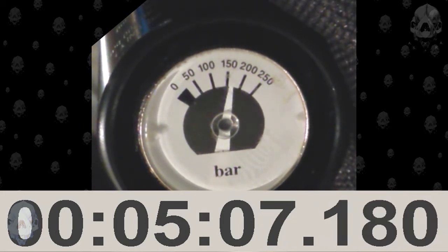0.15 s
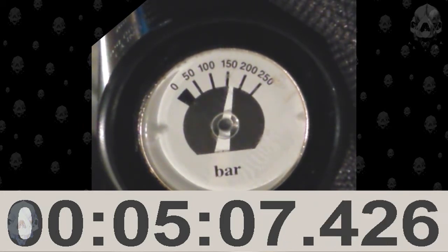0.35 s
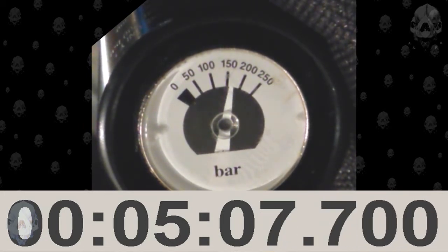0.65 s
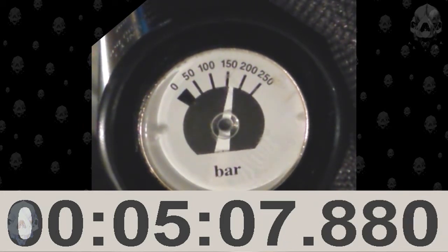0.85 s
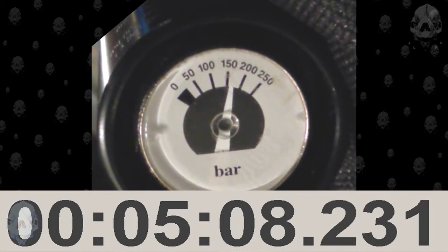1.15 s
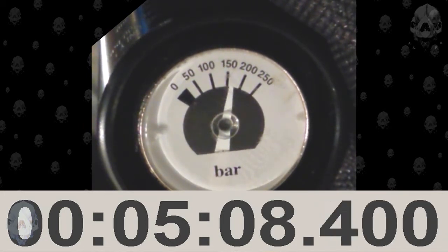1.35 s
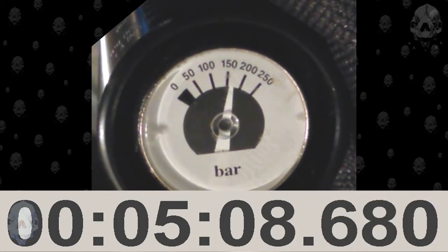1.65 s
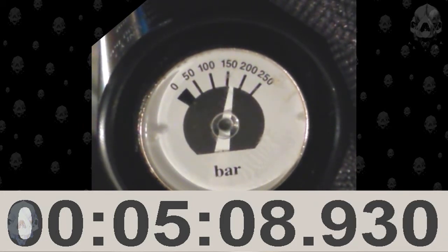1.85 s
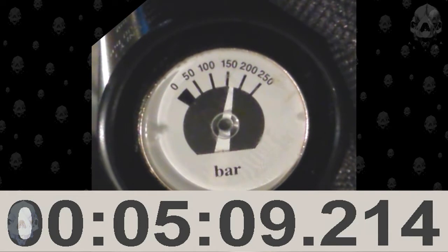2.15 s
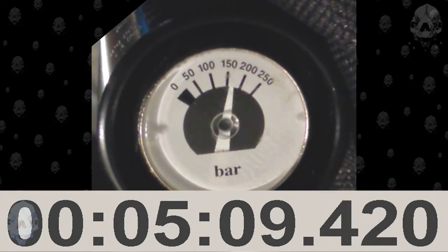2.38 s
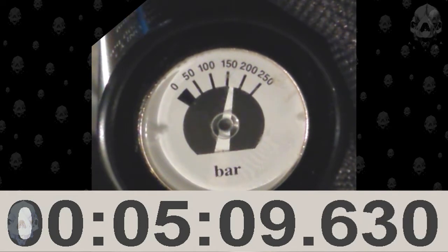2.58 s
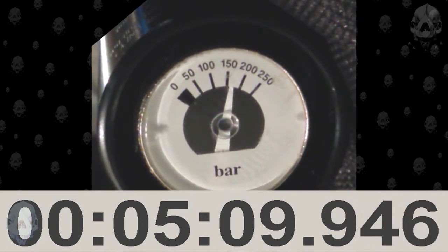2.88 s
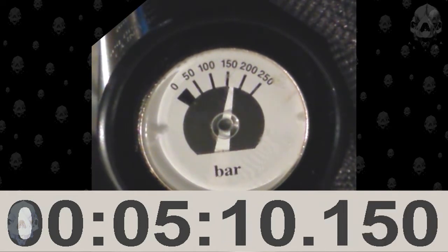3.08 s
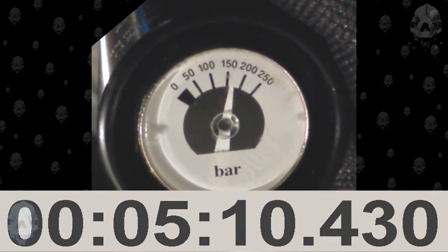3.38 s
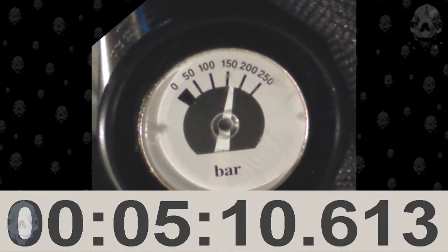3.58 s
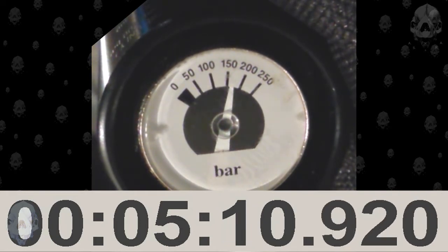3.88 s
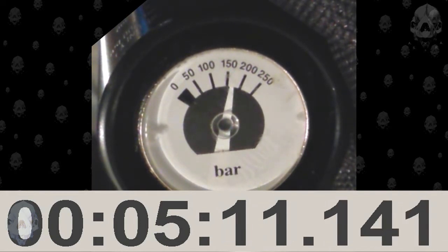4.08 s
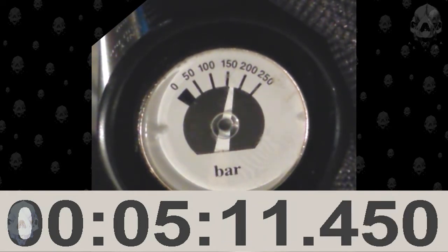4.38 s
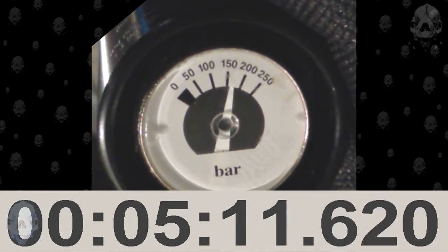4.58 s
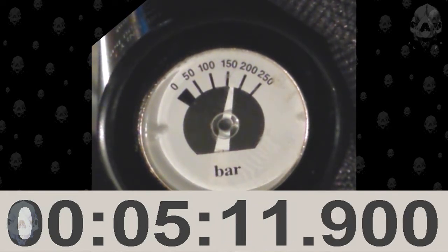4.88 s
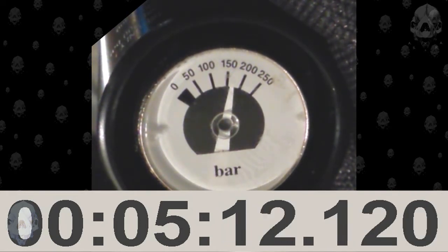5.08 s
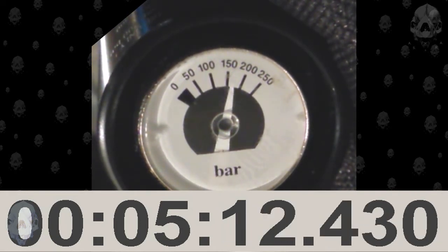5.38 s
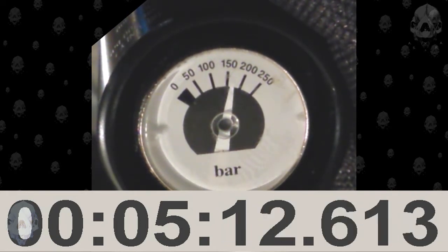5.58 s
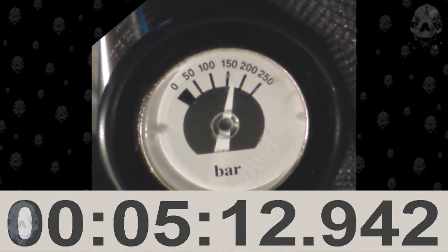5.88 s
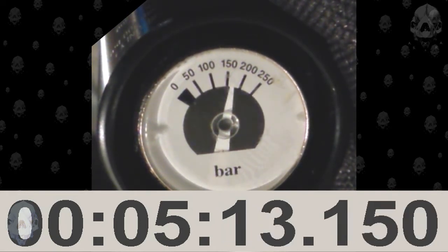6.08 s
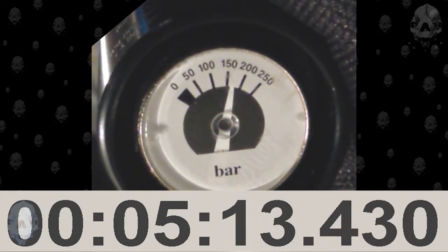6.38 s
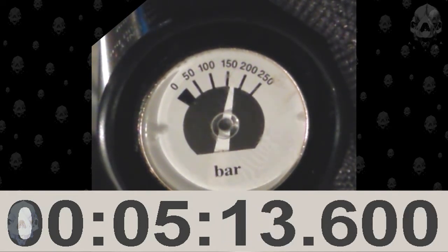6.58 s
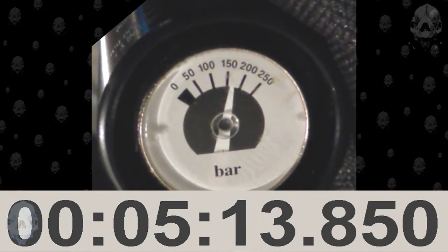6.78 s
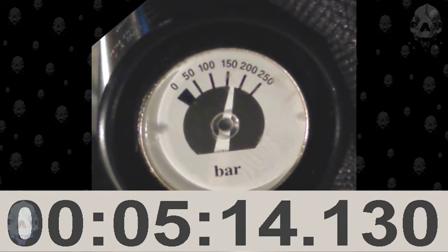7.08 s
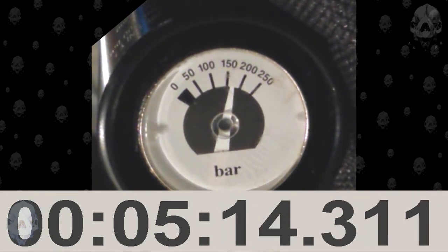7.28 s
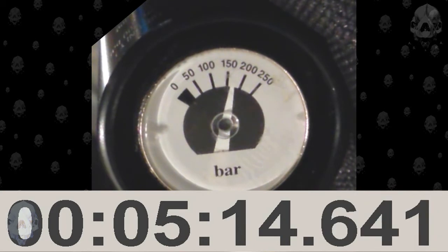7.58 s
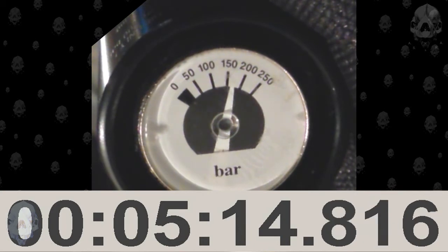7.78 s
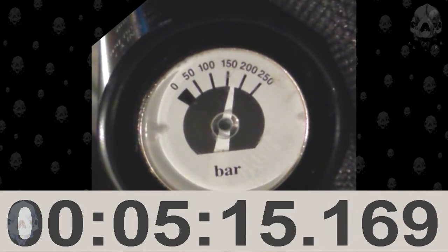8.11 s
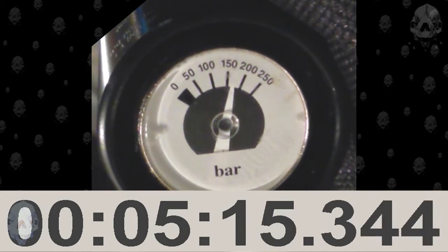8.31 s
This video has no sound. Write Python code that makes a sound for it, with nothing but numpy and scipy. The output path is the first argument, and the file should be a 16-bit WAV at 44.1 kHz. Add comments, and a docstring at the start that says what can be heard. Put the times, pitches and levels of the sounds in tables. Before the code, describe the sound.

In a small room, an air compressor works without pause, heard from nearby in stereo. Piston chugs, knocking and grinding gears and a pulsing low hum form an even pattern that comes round almost twice a second. Above it are a motor whirr, a thin air hiss and a rasping, ticking valve that gives a few light snaps in the first half. Late on, one rough stroke briefly shakes the housing.

```python
"""A small geared piston compressor fills an air cylinder indoors, its crank turning just under twice a second.
Three compressions a turn load the machine: the piston chugs, the housing drones in surges and the gears
grind under their whine. A valve rasps and ticks each turn, at times snapping, over a thin hiss of air.
Impacts excite the resonances of housing, motor case and air line; motor and frame hum at harmonics
of the crank. Near walls reflect the clatter over a faint rumble, and one late stroke judders."""
import sys
import numpy as np
from scipy import signal
from scipy.fft import rfft, irfft, next_fast_len
from scipy.io import wavfile
from scipy.ndimage import map_coordinates

SR = 44100
rng = np.random.default_rng(int(sys.argv[2]) if len(sys.argv) > 2 else 0)


def transcribe(signal):
    """Save signal, clipped to [-1, 1], as a 16-bit WAV file at the path in sys.argv[1]."""
    frames = np.atleast_2d(signal).T
    limited = np.clip(frames, -1, 1)
    pcm = np.round(limited * 32767).astype(np.int16)
    wavfile.write(sys.argv[1], SR, pcm)


N = 372644
TURN_S = 0.57352  # period of the crank
TIME = np.arange(N) / SR
ONE_TURN = np.arange(round(TURN_S * SR)) / SR

# spectrum of the air's hiss: frequency_hz, level_db
AIR_SPECTRUM = [(2000, -21.5), (3800, 3), (4600, 7), (5500, 4), (7000, -2), (8000, 0.5), (9400, 4.5),
                (11000, 1), (13500, -10), (15800, -13)]
# resonances of the steel air line: centre_hz, width_hz, lift_db, left_over_right_db
PIPE_MODES = [(4570, 210, -3.5, -18), (6100, 390, 4.5, -4.5), (8500, 280, 7.5, 9), (9050, 130, 11, 8.5),
              (9380, 170, 1, -15)]


def amp(db):
    """Decibels to amplitude ratio."""
    return 10 ** (np.asarray(db) / 20)


def unit(x):
    """Scale to rms 1."""
    return x / np.sqrt(np.mean(x ** 2) + 1e-20)


def along(points, hz):
    """Interpolate (frequency_hz, value) points on a logarithmic frequency axis."""
    frequencies, values = np.transpose(points)
    return np.interp(np.log(hz + 1), np.log(frequencies + 1), values)


def wobble(rate):
    """Smooth random modulation, rate knots a second."""
    return map_coordinates(rng.standard_normal(int(N * rate / SR) + 4), [TIME * rate])


def every_turn(pattern, clock):
    """Periodic extension of a waveform one turn long."""
    return map_coordinates(pattern, [clock / TURN_S % 1 * len(pattern)], mode="grid-wrap")


def shaft(clock, order):
    """A rotational harmonic: order cycles to each turn of the crank."""
    return np.cos(2 * np.pi * order * clock / TURN_S)


def swells(rows, clock, rise_s, fall_s, period_s=TURN_S):
    """Periodic envelope: linear rise, hold and exponential fall for each (start_s, length_s, height)."""
    out = 0
    for start, length, height in rows:
        age = (clock - start) % period_s
        out = out + height * np.minimum(age / rise_s, 1) * np.exp(-np.maximum(age - length, 0) / fall_s)
    return out


def bursts(rows, decay_s, period_s, scatter_db):
    """Damped impacts: exponentially decaying noise at each (start_s, level_db), in every period."""
    envelope = np.zeros(N)
    for start, db in rows:
        index, age = np.divmod(TIME - start, period_s)
        sizes = amp(db + scatter_db * rng.standard_normal(size=32))
        envelope += sizes[index.astype(int) + 1] * np.exp(-age / decay_s)
    return envelope * rng.standard_normal((2, N))


def grit(shape, per_s):
    """Shot noise: tiny impacts, random in time and size."""
    return unit(rng.standard_normal(shape) * (rng.random(shape) < per_s / SR))


def teeth(clock, per_s, repeat):
    """Tooth impacts: the share repeat of their power is periodic with the crank, the rest random."""
    worn = np.array([every_turn(pattern, clock) for pattern in grit((2, len(ONE_TURN)), per_s)])
    return np.sqrt(repeat) * unit(worn) + np.sqrt(1 - repeat) * grit((2, N), per_s)


def load(clock):
    """Cyclic loading: the piston's effort in dB over idling."""
    # three compressions a turn: start_s, length_s, load_db
    strokes = [(.062, 0.098, 11), (.279, 0.18, 11), (.491, 0.082, 9.5)]
    return swells(strokes, clock, rise_s=.035, fall_s=.028)


def radiate(drives, spectrum, modes=()):
    """Source and filter: two independent drives pass through a resonant body into stereo, at rms 1."""
    # likeness of the two channels: frequency_hz, correlation
    coherence = [(250, 0.93), (400, 0.96), (640, 0.5), (1400, 0.45), (3100, 0.023), (6000, 0)]
    # stereo balance of the machine: frequency_hz, left_over_right_db
    balance = [(200, -9.5), (380, -3), (700, 0.5), (1300, 0), (2300, 3), (4400, 0.5), (15000, 0.5)]
    size = next_fast_len(N + SR // 2, True) // 2 * 2
    hz = np.fft.rfftfreq(size, 1 / SR)
    gain_db, pan_db = along(spectrum, hz), along(balance, hz)
    for centre_hz, width_hz, lift_db, side_db in modes:
        bell = 1 / (1 + (2 * (hz - centre_hz) / width_hz) ** 2)
        gain_db += lift_db * bell
        pan_db += (side_db - along(balance, centre_hz)) * bell
    cepstrum = irfft(np.log(amp(gain_db)))
    cepstrum[1:size // 2] *= 2  # folding gives a causal, minimum-phase response
    cepstrum[size // 2 + 1:] = 0
    angle = np.arccos(np.clip(along(coherence, hz), -1, 1)) / 2
    mid, side = rfft(drives, size) * np.exp(rfft(cepstrum)) * [np.cos(angle), np.sin(angle)]
    stereo = np.array([mid + side, mid - side]) * amp([pan_db / 2, -pan_db / 2])
    return unit(irfft(stereo)[:, :N])


def hum(clock):
    """Harmonics of the crank: frame and motor hums swell once a turn, gear tones with the load."""
    # tones of the gear train: cycles_per_turn, level_db
    mesh_tones = [(51, -52), (94, -44.5), (109, -35), (163, -38), (197, -40), (267, -42), (357, -42.5)]

    def tone(order):
        return np.sqrt(2) * np.sin(2 * np.pi * (order * clock / TURN_S + rng.random()))

    frame_db = -51 + swells([(.255, .42, 11.8)], clock, rise_s=0.037, fall_s=0.08)
    motor_db = -46 + swells([(.535, .25, 10.5)], clock, rise_s=0.077, fall_s=0.01)
    low = amp(frame_db) * tone(order=37) * amp([[-.5], [.5]]) + amp(motor_db) * tone(order=68)
    mesh = sum(amp(db + 1.5 * wobble(5)) * tone(order) for order, db in mesh_tones)
    return low + mesh * unit(amp(load(clock))) * amp([[-1], [1]])


def motor(clock):
    """Amplitude modulation: the motor's whirr buzzes with its hum and throbs with its shaft."""
    # spectrum of the whirr: frequency_hz, level_db
    spectrum = [(1200, -29.5), (2200, -12.5), (2600, -0.5), (3300, -0.5), (3900, -11.5), (6000, -41)]
    # resonances of the steel case: centre_hz, width_hz, lift_db, left_over_right_db
    case_modes = [(2430, 98, 7.5, 2), (2897, 58, 9, -1), (3200, 64, 2, 5.5), (3410, 18, -1, 0)]
    buzz_db = 1.5 * shaft(clock, order=68) + 1.8 * shaft(clock, order=18) + 1.6 * wobble(50)
    return amp(-31) * radiate(amp(buzz_db) * grit((2, N), per_s=14000), spectrum, case_modes)


def air(clock):
    """Flow noise excites the steel line's modes and flutters with the motor, over a steady hiss."""
    flutter_db = 0.12 * load(clock) + .7 * shaft(clock, order=34) + 0.96 * wobble(90)
    flow = amp(flutter_db) * grit((2, N), per_s=12000)
    sizzle = amp(-39.5) * radiate(flow, AIR_SPECTRUM, PIPE_MODES)
    hiss = amp(-56) * radiate(rng.standard_normal((2, N)), [(5000, -20), (11000, 0), (15800, -3)])
    return sizzle + hiss


def rumble():
    """Stationary low-frequency noise: the room's faint rumble."""
    spectrum = [(15, -9), (35, -28), (58, 5.5), (85, -2.5), (110, 6.5), (200, -22), (1000, -80)]
    return amp(-42) * radiate(rng.standard_normal((2, N)), spectrum)


def gears(clock):
    """Impact excitation: teeth grind with the load and knock in the housing; a whine throbs above."""
    # knocks as the backlash is taken up in each turn: start_s, level_db
    knocks = [(.009, -8.5), (.120, -3), (.150, -2.5), (.277, -3), (.310, 3), (.377, 1), (.422, -24),
              (.452, 5.5), (.535, 3.5)]
    # spectrum of the grinding: frequency_hz, level_db
    spectrum = [(100, -51), (250, -34), (400, -14), (540, -13), (700, -0.5), (870, -5), (950, -10),
                (1300, -3.5), (1550, -8.5), (1750, -18), (2200, -17), (3300, -12.5), (4000, -30),
                (7000, -55.5)]
    # resonances of the housing: centre_hz, width_hz, lift_db, left_over_right_db
    housing_modes = [(625, 75, 10.5, -4), (773, 24, 5.5, 9.5), (811, 34, 6.5, -2.5), (845.3, 14, 11.5, -6),
                     (874, 21, 9.5, -3), (1015, 21, 1, -10), (1169, 137, 9, -10.5), (1460, 58, 4.5, -1.5)]
    layshaft = shaft(clock - .008, order=17)
    throb_db = 0.6 * layshaft + 2 * shaft(clock, 36) + shaft(clock, 108) + shaft(clock, 133)
    grinding = unit(amp(0.41 * load(clock) + throb_db)) * teeth(clock, per_s=14000, repeat=0.067)
    knocking = amp(1.5) * bursts(knocks, decay_s=0.007, period_s=TURN_S, scatter_db=0.4)
    whine_hz = 809.7 + 5.99 * wobble(20)
    whine_db = -33 + 6 * layshaft + 2 * wobble(40)
    whine = amp(whine_db) * np.sin(2 * np.pi * np.cumsum(whine_hz) / SR)
    return amp(-23) * radiate(grinding + knocking, spectrum, housing_modes) + whine


def room(sound):
    """Reverberation: reflections from the walls decay exponentially, each frequency at its own rate."""
    # reverberation time: frequency_hz, t60_s
    decay_times = [(200, 0.19), (2000, 0.2), (10000, 0.23)]
    hz, age, noise = signal.stft(rng.standard_normal((2, SR // 2)), SR, nperseg=256)
    colour = amp(along([(300, -36), (700, 9)], hz))[:, None]
    decay = amp(-60 * age / along(decay_times, hz)[:, None])
    tail = signal.istft(noise * colour * decay, SR, nperseg=256)[1]
    return signal.fftconvolve(sound, tail / np.linalg.norm(tail[0]), axes=1)[:, :N]


def piston(clock):
    """Periodic forcing: the piston chugs at each compression and thumps in a falling chirp on reversal."""
    # spectrum of the chug: frequency_hz, level_db
    spectrum = [(120, -55), (190, -8.5), (260, 0.5), (300, -3.5), (380, -5), (450, 1.5), (540, -4),
                (640, 1), (730, -0.5), (950, -18.5), (2000, -33)]
    # thumps in each turn: centre_s, pitch_hz, fall_hz_per_s, half_length_s, level_db
    thumps = [(.055, 76, 150, .022, -30), (.536, 280, 1500, .013, -25.5)]
    force = amp(load(clock)) * teeth(clock, per_s=6000, repeat=0.54)
    out = amp(-29.5) * radiate(force, spectrum, [(480, 11, 4.1, -3.9)])
    for centre, hz, fall, half_length, db in thumps:
        age = (clock - centre + TURN_S / 2) % TURN_S - TURN_S / 2
        cycles = hz * age - fall * age ** 2 / 2 + 0.13 * wobble(1.675)
        envelope = amp(db + wobble(1.57)) * np.exp(-(age / half_length) ** 2)
        out += envelope * np.sqrt(2) * np.sin(2 * np.pi * cycles)
    return out


def drone(clock):
    """Stiffening resonance: the housing sings sharper when loud and swoops down as the valve lets go."""
    # surges in each turn: start_s, length_s, level_db
    surges = [(0.082, 0.03, -17), (0.177, .038, -30), (0.279, 0.0302, -20), (0.316, 0.053, -17.5),
              (0.416, 0.042, -31), (0.528, 0.062, -31)]
    rest_hz, stiffen_hz = 219.6, 3.5
    swoop_start_s, settle_s = .521, .024
    heights = [(start, length, amp(db)) for start, length, db in surges]
    level = amp(-28.5) + swells(heights, ONE_TURN, rise_s=0.0076, fall_s=0.0049)
    swoop_hz = 81.7 * np.exp(-((ONE_TURN - swoop_start_s) % TURN_S) / settle_s)
    cycles = np.cumsum(rest_hz + stiffen_hz * level / level.max() + swoop_hz) / SR
    cycles *= np.round(cycles[-1]) / cycles[-1]  # retune slightly to whole cycles per turn
    song = every_turn(np.sqrt(2) * level * np.sin(2 * np.pi * cycles), clock + 0.00027 * wobble(11))
    shudder_spectrum = [(150, -71), (185, -2), (235, -12), (275, -11), (360, -40.5)]
    shudder = radiate(teeth(clock, per_s=1700, repeat=0.3), shudder_spectrum)
    roughness = amp(-18) * shudder * every_turn(level, clock)
    return amp(.5 * wobble(7)) * (song * amp([[-.7], [.7]]) + roughness)


def after_ring(clock):
    """Beating: shaken by each compression, the housing rings on loosely, close to its drone's pitch."""
    # slow drift of the ringing: time_s, level_db
    drift = [(0, -24), (1.5, -29.5), (3.2, -28.5), (5.5, -26.5), (7.2, -26), (8.4, -26)]
    shaking = amp(load(clock - .025)) * teeth(clock, per_s=3000, repeat=.2)
    spectrum = [(130, -36.5), (180, -8), (250, -5), (310, -10), (420, -40)]
    ring = radiate(shaking, spectrum, [(222.7, 64, 25, 1.0)])
    return amp(np.interp(TIME, *np.transpose(drift))) * ring


def valve(clock):
    """Flow and impact excitation: the valve rasps, sets its steel ringing, ticks on its seat and snaps."""
    # blow-off in each turn: start_s, length_s, rasp_lift_db
    blow_off = [(.491, 0.084, 9)]
    # spectrum of the rasp: frequency_hz, level_db
    spectrum = [(150, -25), (280, 1.5), (420, -2.5), (900, -16.5), (1400, 4.5), (2000, 2.5), (2500, -9.5),
                (3000, 2), (4000, -11), (8000, -37)]
    # ticks in each turn: start_s, relative_level_db
    ticks = [(.206, -3), (.490, -8), (.509, -2), (.544, 0)]
    # single hard snaps: start_s, relative_level_db
    snaps = [(1.6914, -16), (2.787, -20), (2.8376, -16), (3.9526, -20), (4.558, -12.5)]
    rasp_db = 0.24 * load(clock) + swells(blow_off, clock, rise_s=.008, fall_s=.008)
    rasp = amp(-33) * radiate(amp(rasp_db) * teeth(clock, per_s=9000, repeat=0.17), spectrum)
    build_up = amp(1.36 * swells(blow_off, clock, rise_s=0.069, fall_s=0.015))  # lags the rasp
    ring = amp(-36.8) * unit(build_up * np.sin(2 * np.pi * (2936 * TIME + .18 * wobble(70))))
    tick_drive = bursts(ticks, decay_s=.006, period_s=TURN_S, scatter_db=1.8)
    snap_drive = bursts(snaps, decay_s=.0055, period_s=N / SR, scatter_db=0)
    ticking = amp(-49) * radiate(tick_drive, AIR_SPECTRUM, PIPE_MODES)
    snapping = amp(-51) * radiate(snap_drive, AIR_SPECTRUM, [(10000, 3000, 3.4, 0)])
    return rasp + ring * amp([[1.5], [-1.5]]) + ticking + snapping


def judder(clock):
    """Forced vibration: one stroke runs roughly and shakes the whole housing."""
    # the rough stroke: start_s, length_s, level_db
    stroke = [(7.187, 0.083, -23.5)]
    spectrum = [(140, -31), (190, -4), (290, 1), (360, -12), (480, -12), (700, -46)]
    shake = radiate(grit((2, N), per_s=2300), spectrum, [(217, 77, 1.8, -1.1)])
    heights = [(start, length, amp(db)) for start, length, db in stroke]
    return shake * swells(heights, clock, rise_s=0.018, fall_s=.02, period_s=N / SR)


def scene():
    """Superposition: the parts follow one slightly wavering crank; only the clatter reverberates."""
    clock = TIME + 0.00028 * wobble(1.226)
    clatter = gears(clock) + motor(clock) + valve(clock) + air(clock)
    housing = drone(clock) + after_ring(clock) + judder(clock)
    return housing + hum(clock) + piston(clock) + clatter + amp(-8.5) * room(clatter) + rumble()


def record(dry):
    """Band limiting: an ideal low-pass filter removes the highest treble."""
    cutoff_hz = 15850
    size = next_fast_len(N + SR // 2)
    passband = np.fft.rfftfreq(size, 1 / SR) < cutoff_hz
    return irfft(rfft(dry, size) * passband, size)[:, :N]


dry = scene()
out = record(dry)
transcribe(out)
```